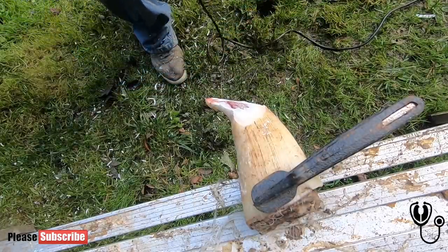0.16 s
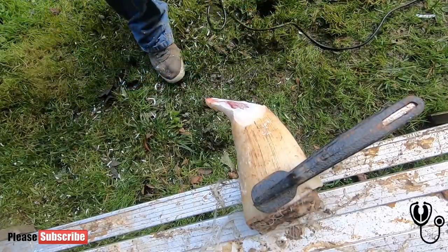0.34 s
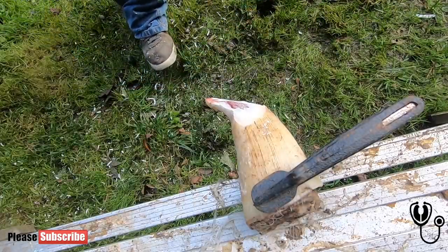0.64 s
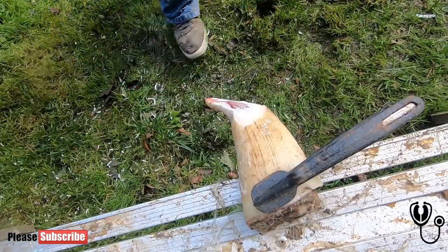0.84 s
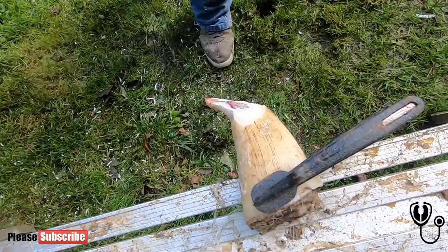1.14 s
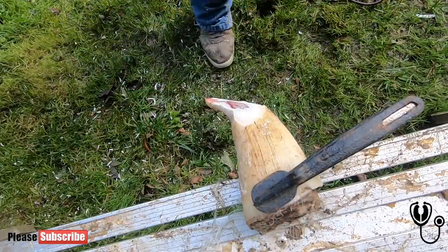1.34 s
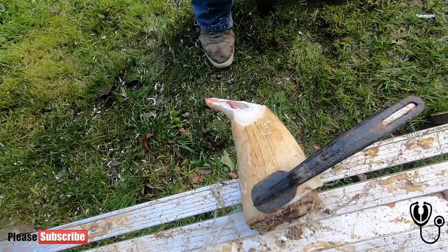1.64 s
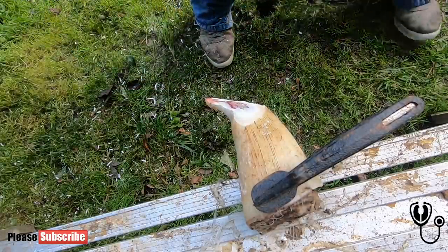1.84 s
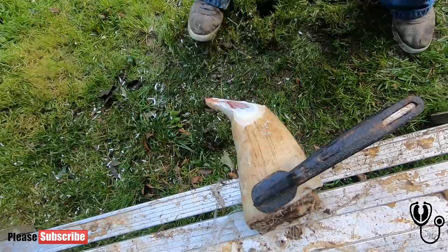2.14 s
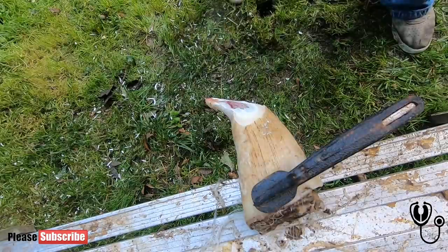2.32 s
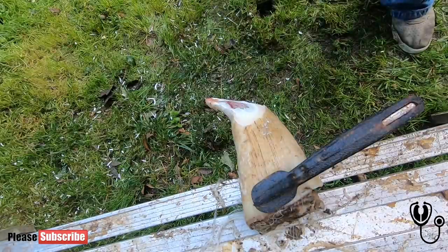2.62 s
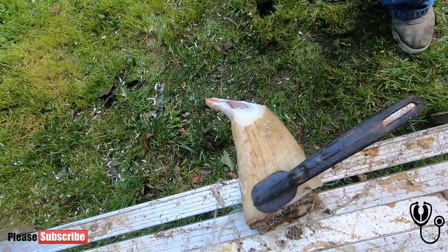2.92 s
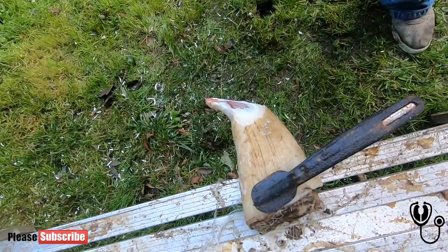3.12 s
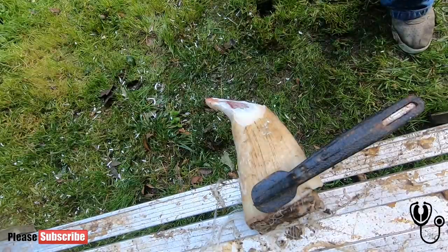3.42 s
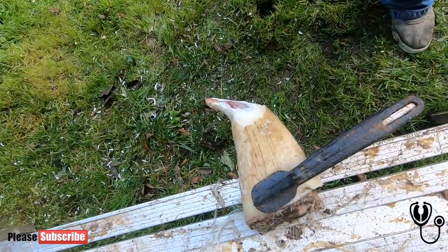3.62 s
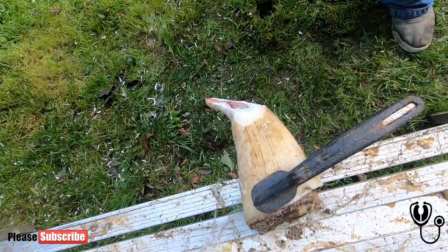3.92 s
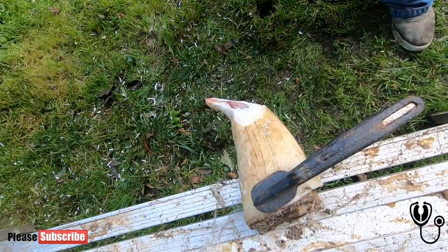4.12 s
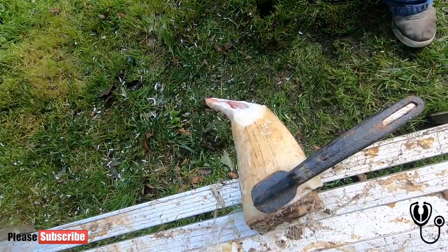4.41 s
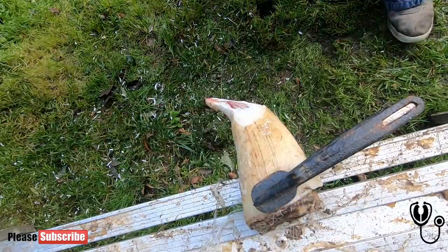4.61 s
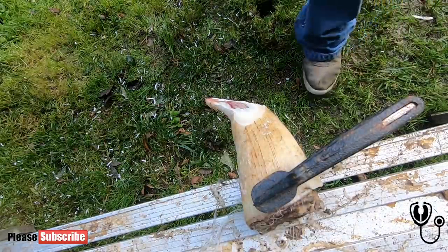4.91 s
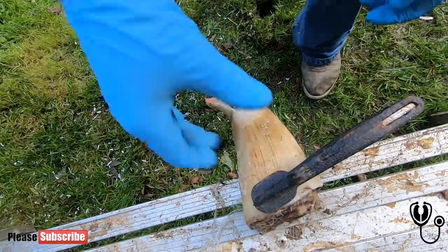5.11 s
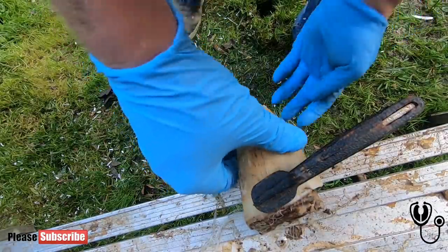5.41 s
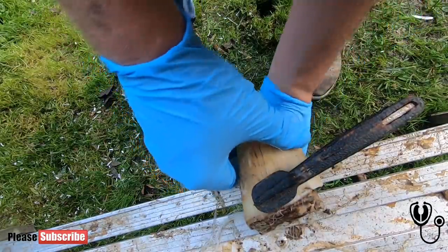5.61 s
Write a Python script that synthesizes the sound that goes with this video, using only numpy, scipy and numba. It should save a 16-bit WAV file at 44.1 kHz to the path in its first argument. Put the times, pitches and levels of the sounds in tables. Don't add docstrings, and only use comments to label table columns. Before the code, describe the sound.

On a lawn, a small stereo camera about a step away hears a grinder coast down, starting loud and bright, drifting to the right, its chatter thinning into a dull rattle. It stops with several bouncing knocks. Near silence remains, with soft shoe and glove rustles, a sharp tick, a bench nudge, and finally a deep wobbling thud with a faint creak.

```python
import sys
import numpy as np
from scipy import signal
from scipy.fft import rfft, irfft
from scipy.io import wavfile
from scipy.ndimage import uniform_filter1d
from numba import njit

SR = 44100
rng = np.random.default_rng(int(sys.argv[2]) if len(sys.argv) > 2 else 0)


def amplitude_ratio(level_db):
    exponent = np.asarray(level_db, float) / 20
    return 10 ** exponent


def to_wav(s):
    ch = np.atleast_2d(s).T
    pcm = np.round(np.clip(ch, -1, 1) * 32767)
    wavfile.write(sys.argv[1], SR, pcm.astype(np.int16))


N = 253575
T = np.arange(N) / SR
F = np.fft.rfftfreq(N, 1 / SR) + 1e-3
SIDE = np.array([[.5], [-.5]])


def curves(table):
    s, *columns = np.transpose(table)
    return [np.interp(T, s, c) for c in columns]


def along(points):
    hz, value = np.transpose(points)
    return np.interp(np.log(F), np.log(hz + 1), value)


def unit(x):
    return x / np.sqrt(np.mean(x ** 2))


def band(x, lo_hz, hi_hz):
    return signal.sosfilt(signal.butter(3, [lo_hz, hi_hz], "band", fs=SR, output="sos"), x)


def shape(x, envelope_db):
    return irfft(rfft(x) * amplitude_ratio(envelope_db), N)


@njit
def svf(x, hz, width):
    y, b, l = np.empty(len(x)), 0., 0.
    for i in range(len(x)):
        g, k = np.tan(np.pi * hz[i] / SR), width / hz[i]
        v = (b + g * (x[i] - l)) / (1 + g * (g + k))
        b, l, y[i] = 2 * v - b, l + 2 * g * v, k * v
    return y


def ring(x, hz, width):
    return svf(x, np.full(len(x), 1. * hz), 1. * width)


def walk(rate):
    k = int(SR / rate)
    held = np.repeat(rng.standard_normal(N // k + 1), k)
    return 2.0 * uniform_filter1d(uniform_filter1d(held, k), k)[:N]


def swells(table):
    return np.array([amplitude_ratio(db) * np.exp(np.minimum((T - s) / swell_s, (s - T) / fade_s))
                     for s, db, swell_s, fade_s, *_ in table])


# (time [s], rotation [Hz])
SPEED = [(0, 312), (.25, 285.3), (.5, 259.7), (.75, 235.5), (1, 212.7), (1.25, 191.5), (1.5, 171.7),
         (2, 134.2), (2.5, 100.2), (3, 67.3), (3.95, 8)]


def rotation_hz():
    return curves(SPEED)[0]


# (multiple of rotation [1], level [dB])
HUM = [(2, -16), (3, -15)]
# (multiple of rotation [1], level [dB], heard from [s], heard until [s])
WHINE = [(2, -61, 1.55, 2.15), (8.68, -53, 1.2, 1.7), (12.3, -45, .1, 1.5), (14.8, -40, 0, .5),
         (14.8, -36, .5, .8), (14.8, -37, .8, 1.1), (14.8, -41, 1.2, 1.85), (14.8, -50, 1.85, 3.02),
         (17.04, -43, 1.05, 1.45), (29.6, -44, 1.5, 1.75), (37, -57, .05, .45), (37, -48, .45, 1.3),
         (37, -40, 1.3, 1.65), (37, -55, 1.7, 2.6), (18.5, -50, 0, .4), (51.7, -44, 1.15, 1.65),
         (11.1, -43, .85, 1.15)]


def rotor():
    speed_hz = rotation_hz()
    octaves = np.log2(speed_hz / speed_hz[0])
    lost_db = 72 * np.minimum(np.log2(speed_hz / 158.4), 0)
    hum_db = -30 + 19.5 * octaves + lost_db
    bearing_db = -28.5 + 28 * octaves + lost_db
    turn = 2 * np.pi * np.cumsum(speed_hz) / SR
    hum = np.sin(turn) + sum(amplitude_ratio(db + 2.9 * walk(6.4)) * np.sin(k * turn) for k, db in HUM)
    bearing = np.sin(1.2335 * turn)
    whine = 0
    for k, db, start_s, end_s in WHINE:
        facing = np.clip(np.minimum(T - start_s, end_s - T) / .12 + .5, 0, 1)
        whine = whine + amplitude_ratio(db + 2 * walk(14)) * facing * np.sin(k * turn + .25 * walk(40))
    rumble = unit(band(rng.standard_normal(N), 164, 585)) * (amplitude_ratio(hum_db - 9) + amplitude_ratio(-61.0)) * (T < 3.95)
    audible = np.clip((2.4 - T) / .3, 0, 1)
    tones = audible * (amplitude_ratio(hum_db) * hum + amplitude_ratio(bearing_db) * bearing) + whine
    return np.sqrt(2) * tones + rumble


# (time [s], whir [dB], vents facing us [dB], echo lobe [Hz], left minus right [dB])
CARRY = [(0, -20, -9.5, 2110, -24), (.3, -22, -13, 3450, -3), (.5, -23.5, -9, 3200, -2.5),
         (.75, -24.5, -8, 2880, -3), (1.0, -26.5, -3.5, 2650, -2.5), (1.5, -25.5, 1, 2050, -3.5),
         (1.75, -29.5, 2.5, 2030, -7.5), (2.0, -31.5, 0, 1750, -12), (2.25, -32.5, -4.5, 1600, -12),
         (2.75, -32, -7, 1890, -10.5), (3.0, -35, -8, 1800, -10), (3.3, -35.5, -8.5, 1760, -10.5),
         (3.6, -38, -10, 1810, -10), (3.85, -42, -10, 1604, -10.5)]


def tool():
    whir_db, vent_db, lobe_hz, pan_db = curves(CARRY)
    speed_hz = rotation_hz()
    mesh = np.clip(np.log2(89.6 / speed_hz) * 2, 0, 1)
    fan = (speed_hz / speed_hz[0]) ** 6
    body_db = whir_db - 14.5 - 0.17 * vent_db + 7 * mesh + 4 * fan
    air_db = whir_db - 9.5 + 4.5 * np.clip(vent_db + 6.5, -8, 0)
    return body_db, whir_db, whir_db + vent_db, air_db, lobe_hz, pan_db


# (frequency [Hz], level per Hz [dB])
HOUSING = [(88, -42.5), (150, 14), (285, -20), (359, -36), (404, -7.5), (509, -10.5), (1270, -4.5),
           (1450, 1), (3220, 9.5), (4560, 6), (5760, -4.5), (9730, -13), (11400, -43.5), (13900, -38),
           (15000, -63)]
# (frequency [Hz], width [Hz], gain [dB])
HOUSING_MODES = [(512.5, 13, 17.5), (784, 380, 12), (1380, 400, 3.5), (2360, 70, 4), (3100, 60, 4),
                 (3570, 130, 3), (4650, 110, 4), (6745, 1090, 12.5)]


def housing(x):
    x = shape(x, along(HOUSING))
    return x + sum((amplitude_ratio(db) - 1) * ring(x, hz, w) for hz, w, db in HOUSING_MODES)


BANDS_HZ = (400, 1200, 5500, 10500, 15500)


def whir():
    *level_db, lobe_hz, pan_db = tool()
    chatter = housing(rng.standard_normal(N) * amplitude_ratio(1.1 * walk(150) + walk(500)))
    chatter = chatter + 0.4 * svf(chatter, lobe_hz, 380.0)
    bands = zip(BANDS_HZ, BANDS_HZ[1:4], level_db)
    parts = (unit(band(chatter, lo, hi)) * amplitude_ratio(db - 1.0) for lo, hi, db in bands)
    return sum(parts) * np.clip((3.945 - T) / 0.0052, 0, 1), pan_db


def air():
    hiss = shape(rng.standard_normal((2, N)), along(HOUSING))
    return unit(band(hiss, *BANDS_HZ[3:])) * amplitude_ratio(tool()[3] + .8 * walk(11.84)) * (T < 3.945)


# (time [s], deep peak [dB], swell [s], fade [s], upper part [dB])
SHAKE = [
    (0, -59, .03, .1, -21),
    (.45, -69, .1, .1, -20),
    (1.1, -56, 0.064, 0.051, -17),
    (1.57, -41, .025, .03, -20),
    (4.03, -63, 0.037, 0.057, -11),
    (4.952, -33.5, 0.011, 0.084, -12.5),
    (5.33, -43.5, 0.022, 0.073, -39),
    (5.6, -52, 0.11, 0.11, -31),
    (5.731, -28, 0.0061, .1, -8.5),
]
# (frequency [Hz], width [Hz], level [dB])
MOUNT = [(27.84, 24, 7.5), (52, 10, 9), (75.6, 11.5, 10.5), (104, 22, 7)]
# (time [s], peak [dB], frequency [Hz], swell [s])
SWAY = [
    (5.276, -40.5, 52, 0.075),
    (5.29, -44.5, 104, 0.071),
    (5.706, -15, 52, 0.14),
    (5.711, -29.5, 104, 0.019),
]
# (time [s], peak [dB], swell [s], fade [s])
CREAK = [
    (5.27, -60, .004, .007),
    (5.45, -83, .02, .04),
    (5.71, -56, 0.0033, .15),
]
# (time [s], share [1])
NUDGED = [(3.94, 0), (3.97, 1), (4.2, 1), (4.3, 0), (5.2, 0), (5.27, 1)]


def shake():
    puffs = swells(SHAKE)
    speed_hz = rotation_hz()
    calm = amplitude_ratio(-77.5) + amplitude_ratio(-81) * speed_hz / speed_hz[0]
    push = rng.standard_normal((3, N))
    modes = sum(amplitude_ratio(db) * unit(ring(ring(push[0], hz, w), hz, 2 * w)) for hz, w, db in MOUNT)
    deep = (calm + puffs.sum(axis=0)) * amplitude_ratio(-4.5) * unit(modes)
    deep = deep * np.clip((5.72 - T) / .05, .3, 1)
    for s, db, hz, swell_s in SWAY:
        t = np.maximum(T - s, 0)
        swing = (t / swell_s * np.exp(1 - t / swell_s)) ** 2
        deep = deep + amplitude_ratio(db) * swing * np.sin(2 * np.pi * hz * t)
    upper_level = amplitude_ratio(-76) + amplitude_ratio(np.array(SHAKE)[:, 4]) @ puffs
    upper = unit(band(push[1], 130, 236)) * upper_level * (T > 3.94)
    creak = unit(ring(push[2], 1270, 60)) * swells(CREAK).sum(axis=0)
    nudged = curves(NUDGED)[0]
    deep = deep * (1 + nudged * np.array([[-2.1], [2.1]]))
    upper = upper * (1 + nudged * np.array([[-.4], [.4]]))
    return deep + upper + creak * np.array([[.6], [1.8]])


def blows(table, lead, scrape_s, width, ringing, low_hz, low_fall_s, gain_db, order):
    out, t = np.zeros(N + 2048), T[:2048]
    chance = rng.standard_normal((len(table), 2049))
    for (s, db, hz, low_db, high_db, *second), row in zip(table, chance):
        length, noise = scrape_s * np.exp(0.22 * row[0]), row[1:]
        swell = (t / length) ** order * np.exp(-t / length)
        scrape = noise * swell
        scrape[swell.argmax()] = 2.5 * swell.max()
        rings = 0
        for f, ring_db in [(hz, 0), second or (hz, -60)]:
            in_step = .7 * swell * np.sin(2 * np.pi * f * t)
            rings = rings + amplitude_ratio(ring_db) * np.sqrt(3200 / f) * ring(scrape + in_step, f, width)
        case = sum((amplitude_ratio(d) - 1) * ring(scrape, f, w) for f, w, d in HOUSING_MODES[2:7])
        middle = 0.79 * band(scrape, 1350, 6320) + case + ringing * rings
        thud = band(ring(noise * t * np.exp(-t / low_fall_s), low_hz, 590), 383, 2000)
        high = band(noise * swell, 5900, 10040) + 1.5 * ring(scrape, 6300, 400)
        top = band(noise * swell, 8700, 14500)
        at = max(int((s - lead * length) * SR), 0)
        for part, part_db in [(middle, 0), (thud, low_db), (high, high_db), (top, high_db - 31)]:
            peak = np.sqrt(4 * uniform_filter1d(part ** 2, size=66).max())
            out[at:at + 2048] += part / peak * amplitude_ratio(db + part_db + gain_db)
    return out[:N]


# (time [s], peak [dB], ring [Hz], second ring [Hz], second ring
# level [dB])
CLACKS = [(0.0345, -16, 4760, 3630, -13), (0.0616, -21, 3620, 1580, 5), (0.0824, -20, 3200, 1870, -7),
          (0.1129, -15, 3370, 5070, 6), (0.1263, -23, 3380, 4600, 9), (0.1453, -16, 2780, 3570, 6),
          (0.1816, -14.5, 3200, 1820, -7), (0.212, -16, 3480, 4440, -12),
          (0.2455, -13.5, 3280, 4100, -10), (0.2757, -14, 3500, 4260, 2),
          (0.3077, -12.5, 3560, 5000, -12), (0.3403, -14, 3430, 4500, -2),
          (0.3728, -13.5, 3300, 4550, -3.5), (0.403, -12, 3300, 3860, -2.5),
          (0.4307, -14, 3420, 4050, 8), (0.4639, -13.5, 3240, 4070, 2.5), (0.499, -11, 3200, 4270, 10),
          (0.5329, -12, 3710, 2600, -0.5), (0.5712, -17, 4000, 4900, -5),
          (0.582, -18, 3730, 2370, 3.5), (0.6066, -10.5, 3750, 2460, -2),
          (0.6425, -12, 2905, 4200, -7), (0.6774, -16, 2990, 3800, 0), (0.7132, -12.5, 2830, 4700, -6),
          (0.7507, -10.5, 2904, 4620, -1), (0.7806, -14.5, 2880, 4560, 5),
          (0.8076, -16, 2800, 3700, -0.5), (0.83, -11, 2810, 4440, 6), (0.8581, -12, 2910, 4240, -1),
          (0.8922, -15, 4470, 2870, -13), (0.9142, -16, 2750, 4500, -12.5),
          (0.9402, -13, 2770, 4800, 9.5), (0.9781, -13, 2560, 4480, 0.5), (1.0103, -14, 2820, 4540, 7),
          (1.0379, -16.5, 2730, 3670, 3.5), (1.0471, -17, 3340, 4980, 0.5),
          (1.0817, -11, 4780, 3100, -12), (1.0985, -20, 4340, 3080, -3),
          (1.1177, -13.5, 4870, 3820, 2), (1.1261, -15.5, 3760, 4580, 5),
          (1.1448, -12, 3760, 4650, -7.5),
          (1.155, -11.5, 4360, 3830, -6), (1.1852, -9.5, 4340, 3070, -18.5),
                (1.2205, -9.5, 4800, 3140, -16), (1.2498, -15, 4900, 3100, -7),
                (1.2615, -14.5, 4400, 3710, -5), (1.293, -11.5, 4470, 2550, -11.5),
                (1.301, -22, 2590, 3700, 4), (1.3393, -10.5, 3140, 4550, 6),
                (1.3739, -9.5, 3240, 4330, -1.5), (1.398, -9, 3200, 4300, 3),
                (1.4082, -12, 4400, 3140, 4.5), (1.4382, -12, 2070, 4350, 6), (1.464, -19, 4420, 2920, -1),
                (1.4773, -16, 4160, 2580, -7.5), (1.4968, -15, 4000, 3230, -4),
                (1.5185, -16, 2070, 4120, 8), (1.5279, -12, 3500, 2100, -3.5),
                (1.5509, -14, 3140, 2120, -8), (1.5797, -11.5, 3510, 2030, -6.5),
                (1.613, -12, 3200, 1960, -8), (1.6376, -11, 2970, 2040, -7), (1.672, -11, 3635, 5490, -10),
                (1.6992, -14, 3560, 5400, 2), (1.7163, -10.5, 3230, 2040, -22),
                (1.74, -16, 3640, 4860, -12), (1.7507, -13.5, 3790, 5300, -7),
                (1.775, -12, 3220, 4650, -20), (1.8093, -11.5, 3130, 4930, -3.5),
                (1.831, -15.5, 1825, 5590, 4.5), (1.8446, -17, 3200, 2470, -10),
                (1.8694, -9.5, 3490, 1820, -7.5), (1.899, -15.5, 3240, 5150, 4),
                (1.928, -15, 3230, 1750, -12), (1.9403, -15, 3420, 1750, -18.5),
                (1.9627, -11.5, 3090, 4360, -24), (1.987, -13, 3330, 4420, 0.5),
                (2.0163, -16, 3260, 4700, -5), (2.031, -16.5, 4370, 3000, -10),
                (2.0576, -18, 4650, 3300, -2), (2.074, -16, 3140, 4850, -2),
          (2.106, -19, 1580, 2340, -2), (2.127, -19.5, 4380, 3380, -1.5), (2.1457, -20, 2980, 5030, 2),
               (2.184, -16.5, 3120, 4200, -4.5), (2.198, -16, 4520, 2700, -7),
               (2.2244, -13.5, 5080, 1595, -9.5), (2.2577, -18, 3390, 4770, -5),
               (2.2803, -19, 3000, 1450, -7), (2.2985, -17, 3280, 4900, -4),
               (2.328, -18.5, 3300, 4630, 1.5), (2.3546, -18.5, 3040, 5180, -3.5),
               (2.3757, -19, 2880, 4900, 2.5), (2.4098, -19, 5300, 3680, -12),
               (2.4344, -20.5, 2510, 1710, -13), (2.4626, -23.5, 2400, 3080, -14),
               (2.482, -17.5, 2450, 1730, -7.5), (2.499, -23, 2400, 3920, -17),
               (2.5142, -17.5, 2440, 5000, -11), (2.5417, -21.5, 1730, 3760, 1),
               (2.5517, -19.5, 3440, 2400, 0.5), (2.5733, -18.5, 1720, 2920, 4.5),
               (2.589, -22, 3130, 1720, -12), (2.6084, -17.5, 2310, 3160, -3), (2.634, -23, 3130, 2200, 8),
               (2.6445, -18, 1820, 3570, 3.5), (2.6535, -22.5, 1790, 3200, 9),
               (2.671, -20.5, 3120, 1830, -9.5), (2.6874, -22, 3100, 2180, -3),
               (2.7058, -18, 2120, 3130, -6), (2.721, -21.5, 1850, 3940, 4), (2.7432, -20, 2280, 1390, -1),
               (2.775, -19.5, 1850, 3480, -6), (2.8162, -24, 2060, 3420, -4),
               (2.8462, -22.5, 1820, 4010, -9), (2.864, -26.5, 1870, 4340, -7),
               (2.8736, -25, 4000, 1870, -0.5), (2.895, -21.5, 4550, 2810, -5),
               (2.91, -24.5, 1850, 4540, -10), (2.935, -22, 1830, 4060, -2.5),
               (2.96, -26.5, 1850, 4320, -3),
          (2.9725, -24.5, 1820, 2810, -0.5), (2.9825, -28, 4600, 1790, -6),
               (2.995, -19.5, 4540, 1850, -11), (3.0146, -24.5, 3570, 4650, 3),
               (3.039, -25, 4320, 1530, -2), (3.065, -21, 3850, 4650, -7), (3.0923, -32, 1540, 3170, -8),
               (3.11, -29, 1520, 3600, -18), (3.1332, -26.5, 4000, 1530, -7), (3.1484, -25, 1830, 4000, -3),
               (3.1694, -26, 3750, 2790, -7), (3.1962, -26.0, 1480, 3600, -1),
               (3.2126, -23.5, 4720, 1490, -3), (3.2523, -27.5, 3700, 1760, -6),
               (3.267, -33, 1800, 3470, -8), (3.297, -33, 1560, 3520, -7.5), (3.316, -32, 3800, 2800, -6),
               (3.3346, -33, 3060, 1800, -13), (3.3479, -27, 3060, 3850, -9),
               (3.3798, -29.5, 3900, 1750, -9), (3.3974, -27, 3760, 3080, 3), (3.4318, -31, 3040, 3850, -7),
               (3.4474, -32, 3800, 4800, 0), (3.4708, -32, 3030, 1510, -4), (3.487, -27.5, 2230, 4770, -1),
               (3.511, -32, 1670, 3860, -5), (3.543, -35, 2850, 1530, -9), (3.569, -28, 3630, 2320, -10),
               (3.5887, -30.5, 3030, 4250, -11), (3.6162, -35, 3160, 3820, -9),
               (3.6338, -30, 3050, 1570, -12), (3.649, -30, 3440, 1600, -2), (3.691, -34, 3300, 1880, -2),
               (3.7085, -27.5, 3280, 2730, -8), (3.7577, -26, 2970, 1390, -9),
               (3.7755, -31.5, 2950, 1490, -2), (3.792, -32, 3090, 4020, -6), (3.8168, -35, 3980, 3170, 2),
               (3.8307, -32, 3520, 2820, -8), (3.8847, -33, 3300, 2570, -19),
               (3.9074, -36, 3130, 1510, -15), (3.925, -43, 2070, 4500, -2)]


def clacks():
    table = np.array(CLACKS)
    low_db, middle_db, high_db = (np.interp(table[:, 0], T, c) for c in tool()[:3])
    thud_db = 2.13 * (low_db - middle_db) + 9
    treble_db = high_db - middle_db - 9.0
    table = np.column_stack([table[:, :3], thud_db, treble_db, table[:, 3:]])
    x = blows(table, lead=4.5, scrape_s=.00065, width=380, ringing=1.7,
              low_hz=700, low_fall_s=.0022, gain_db=.5, order=4)
    x = signal.sosfilt(signal.butter(6, 10800, fs=SR, output="sos"), x)
    return x + 0.24 * svf(x, tool()[4], 200.0)


# (time [s], frequency [Hz], depth [1])
NOTCH = [(.3, 2200, 0), (.7, 1940, 0.38), (1.1, 1980, 0.14), (1.6, 1600, 0.74), (2.0, 1270, 0.34),
         (2.9, 1150, 0)]


def gear_train(chatter, hits):
    contact = uniform_filter1d(hits ** 2, size=300) / (uniform_filter1d(hits ** 2, size=6000) + 1e-12)
    gears = chatter * amplitude_ratio(2.6 * np.clip(contact - 1, -1, 1)) + hits
    notch_hz, depth = curves(NOTCH)
    return gears - np.clip(depth, 0, 1) * svf(gears, notch_hz, 540.0)


# (time [s], peak [dB], ring [Hz], low part [dB], high part [dB])
KNOCKS = [
    (3.9595, -16.5, 2710, -7, -30),
    (3.9694, -13.5, 2910, -6, -13),
    (3.9764, -15, 3370, -7, -32),
    (4.0043, -22, 3070, -10, 0),
    (4.0115, -16, 2880, -0.5, -32),
    (4.0264, -32, 1360, 1, -32),
]


def knocks():
    return blows(KNOCKS, lead=0.14, scrape_s=0.00065, width=200, ringing=0.56,
                 low_hz=910, low_fall_s=0.0027, gain_db=-3.0, order=2)


# (time [s], peak [dB], swell [s], fade [s], treble [dB])
RUSTLE = [
    (4.02, -44, 0.11, 0.044, -4.5),
    (4.48, -64, 0.14, 0.046, 8),
    (4.7, -71, 0.034, 0.072, 4),
    (4.92, -62.5, 0.12, .15, -13),
    (5.1, -59, 0.16, 0.26, -2),
    (5.3, -61.5, 0.24, 0.22, -0.5),
    (5.75, -50, 0.033, .05, -4),
]
# (frequency [Hz], level per Hz [dB])
RUSTLE_COLOUR = [(180, 4), (300, 1), (731, -2), (794, 0), (1670, -2), (2140, -1), (2980, -4), (5210, -10.5),
                 (9760, -17.5), (15500, -51)]
# (frequency [Hz], width [Hz], gain [dB])
GLOVE = [(2150, 230, 3.5), (3200, 90, 2), (4160, 130, 3), (5140, 360, 8), (6080, 100, 8)]
# (time [s], peak [dB])
TICKS = [
    (5.0015, -32),
    (5.258, -20),
    (5.5194, -32),
    (5.7474, -36),
]


def rustle():
    moves = swells(RUSTLE)
    lawn_db, lawn_treble_db = -68.5, -3.5
    level = amplitude_ratio(lawn_db) + moves.sum(axis=0)
    treble = amplitude_ratio(lawn_db + lawn_treble_db) + amplitude_ratio(np.array(RUSTLE)[:, 4]) @ moves
    grains = rng.standard_normal((3, N)) * amplitude_ratio(1.2 * walk(25) + 0.5 * walk(330))
    grains = shape(grains[0] + 1.05 * grains[1:], along(RUSTLE_COLOUR))
    glove = sum((amplitude_ratio(db) - 1) * np.array([ring(g, hz, w) for g in grains]) for hz, w, db in GLOVE)
    grains = grains + (T > 4.75) * glove
    hiss = unit(band(grains, 156, 3770)) * level + unit(band(grains, 3680, 15500)) * treble
    ticks = np.zeros(N)
    for s, db in TICKS:
        ticks[int(s * SR)] = amplitude_ratio(db - 5)
    fade_in = np.clip((T - 3.9) / 0.042, 0, 1)
    return hiss * amplitude_ratio(SIDE) * fade_in + band(ticks, 1200, 9000)


# (frequency [Hz], level [dB])
PORT_DB = [(60, 4), (110, -3), (200, -4.5), (380, 9), (700, 6.5), (1290, 4.5), (2380, 4), (4400, 3.5),
           (8120, 5.5), (15000, 11)]
# (frequency [Hz], phase [rad])
PORT_RAD = [(0, -1.5), (3360, 0.21), (5080, 0.25), (5860, -0.46), (6290, -0.71), (6630, -1.94),
            (8870, 0.32), (9910, 1), (12100, -1.1), (12700, -0.078), (15200, -0.1)]


def ports(x, pan_db, echo_t60_s):
    t = T[:8000]
    decay = np.exp(-np.log(1000) * t / echo_t60_s)
    scatter = rng.standard_normal((2, 8000)) * decay * (t > .0015)
    scatter /= np.sqrt(np.sum(scatter ** 2, axis=1, keepdims=True))
    wet = .1 / (1 + (600 / F) ** 2)
    colour = amplitude_ratio(SIDE * along(PORT_DB)) * np.exp(1j * SIDE * along(PORT_RAD))
    path = np.sqrt(1 - wet) + np.sqrt(wet) * rfft(scatter, N)
    heard = irfft(rfft(x) * colour * path, N)
    bass = irfft(rfft(heard) / (1 + (F / 300) ** 4), N)
    heard = heard - bass
    treble = irfft(rfft(heard) / (1 + (5200 / F) ** 4), N)
    flutter = signal.hilbert(treble) * np.exp(1j * SIDE * .45 * walk(30))
    lag = np.exp(1j * SIDE * 0.16 * np.minimum(pan_db + 5.0, 0))
    turned = signal.hilbert(heard - treble) * lag
    treble_pan_db = 0.27 * pan_db - 1.5
    return bass.mean(axis=0) + turned.real * amplitude_ratio(SIDE * pan_db) + flutter.real * amplitude_ratio(SIDE * treble_pan_db)


def scene():
    chatter, pan_db = whir()
    gears = gear_train(chatter, clacks())
    grinder = rotor() + gears + air() + knocks()
    return ports(grinder, pan_db, echo_t60_s=.04) + rustle() + shake()


def top_cut(x):
    return signal.sosfilt(signal.butter(12, 15690, fs=SR, output="sos"), x)


def record(dry):
    mid = dry.mean(axis=0)
    wide = mid + (dry - mid) * np.clip((T - 0.18) / 0.58, 0, 1)
    return top_cut(wide)


dry = scene()
out = record(dry)
to_wav(out)
```